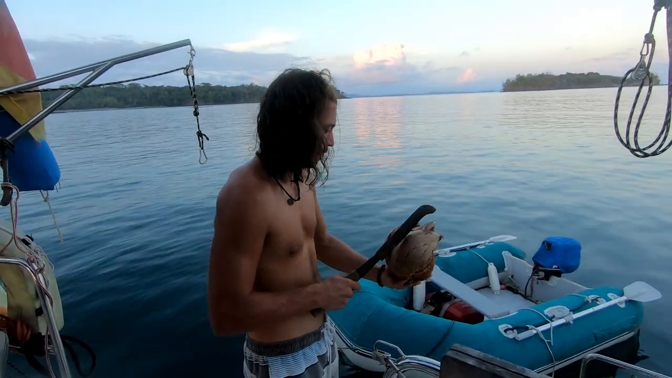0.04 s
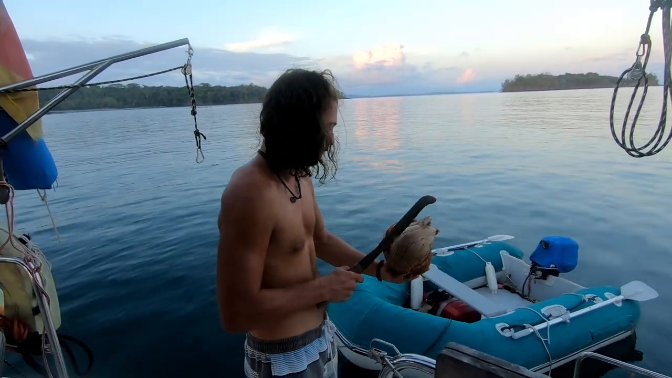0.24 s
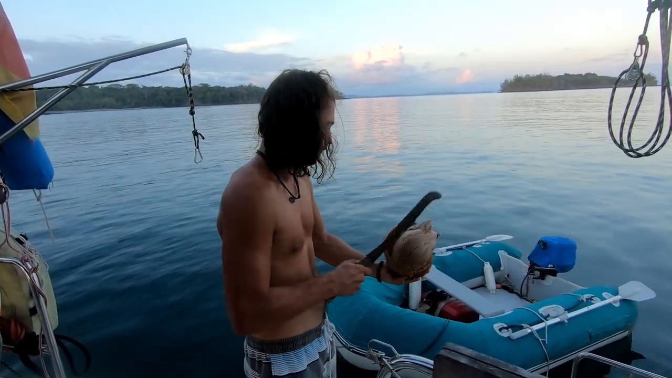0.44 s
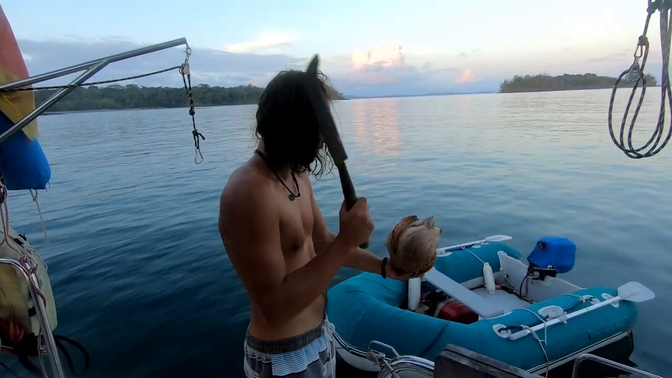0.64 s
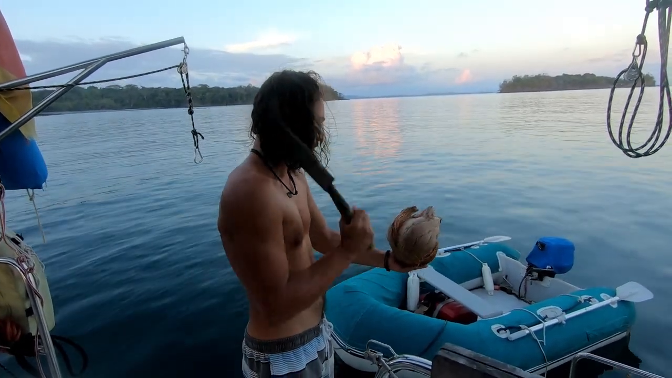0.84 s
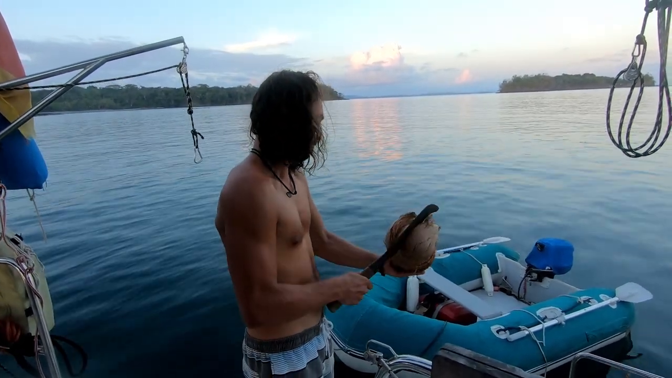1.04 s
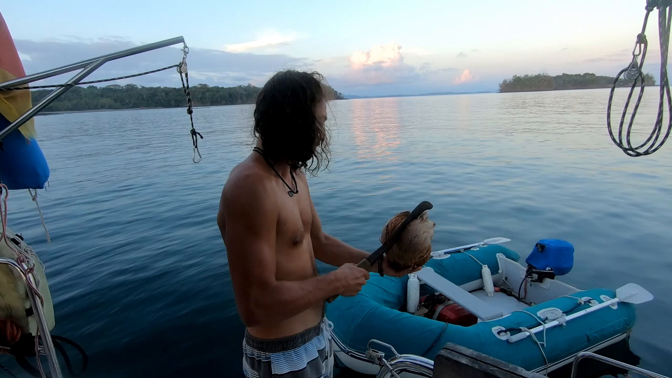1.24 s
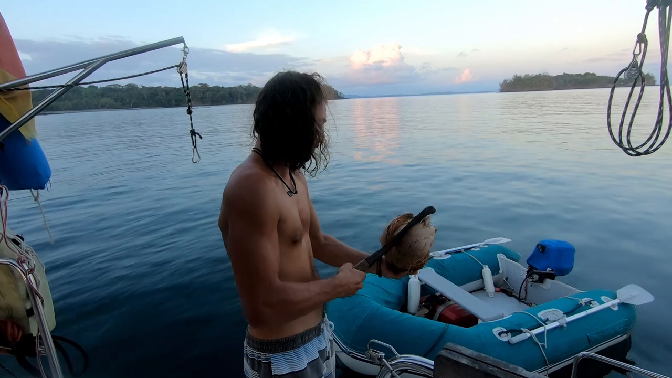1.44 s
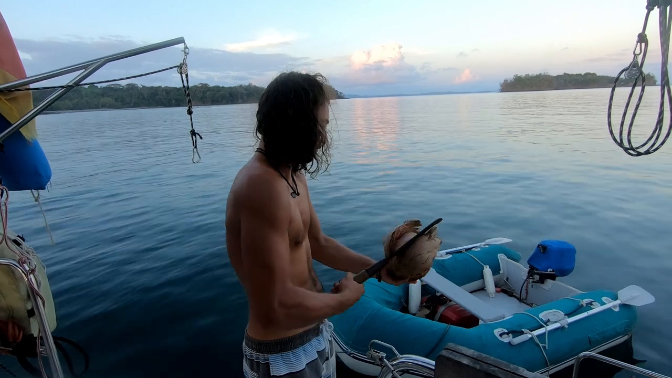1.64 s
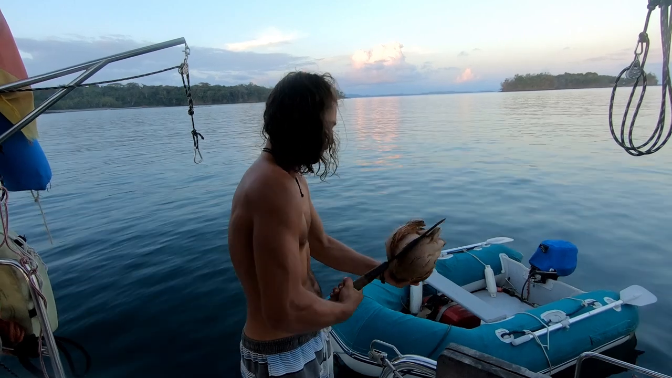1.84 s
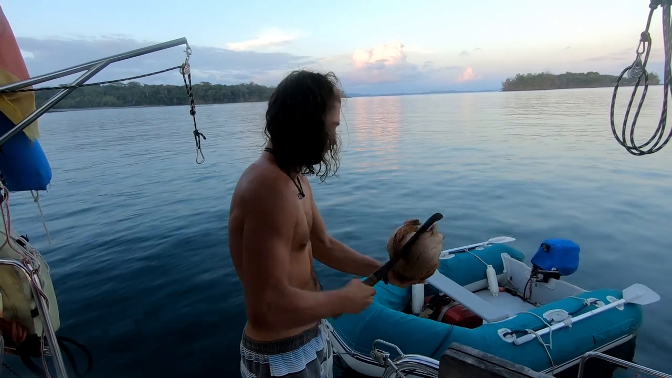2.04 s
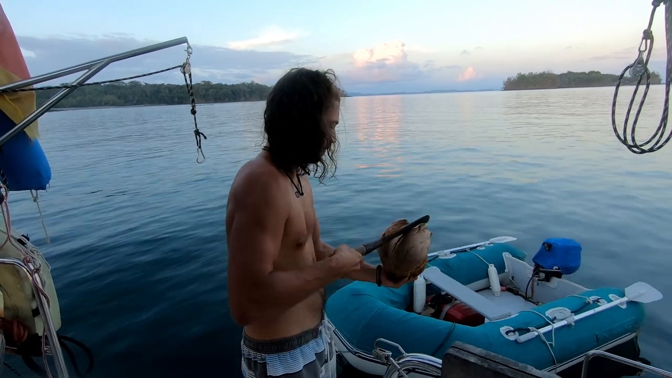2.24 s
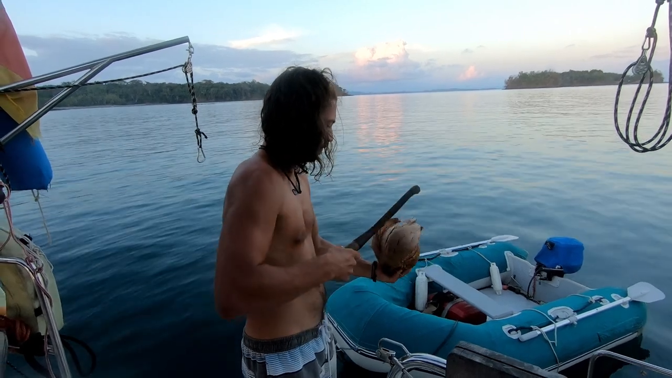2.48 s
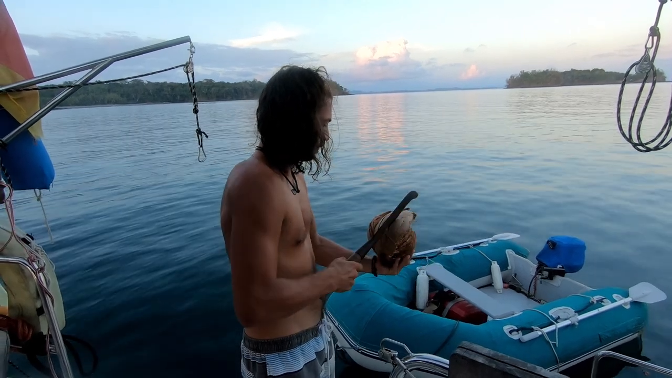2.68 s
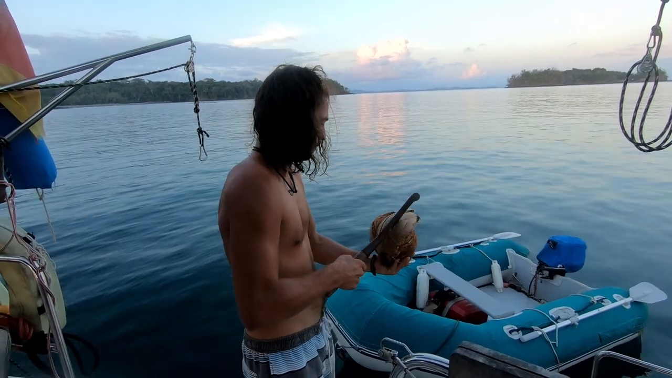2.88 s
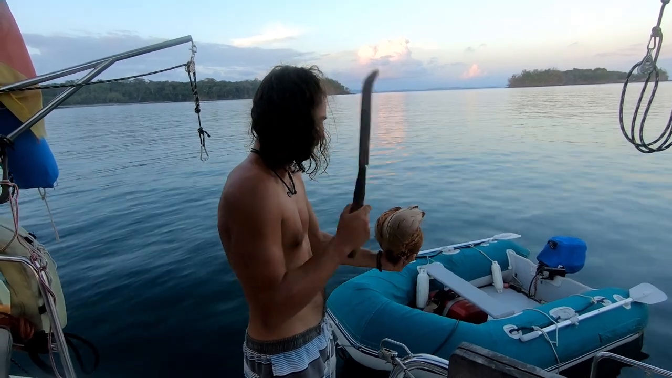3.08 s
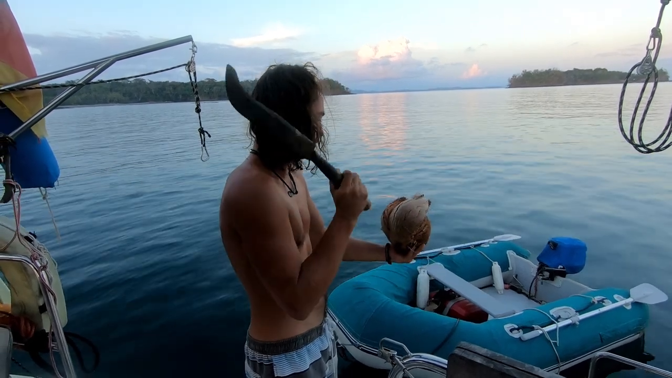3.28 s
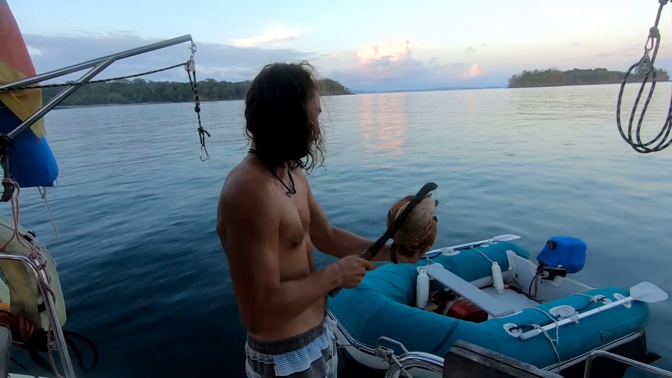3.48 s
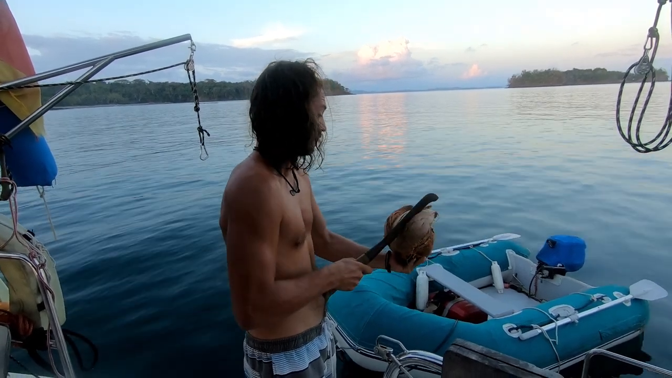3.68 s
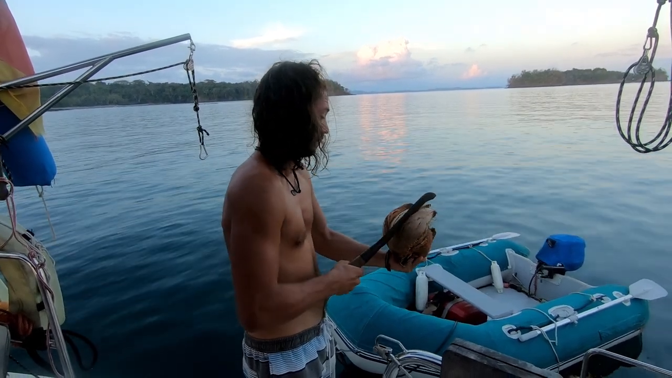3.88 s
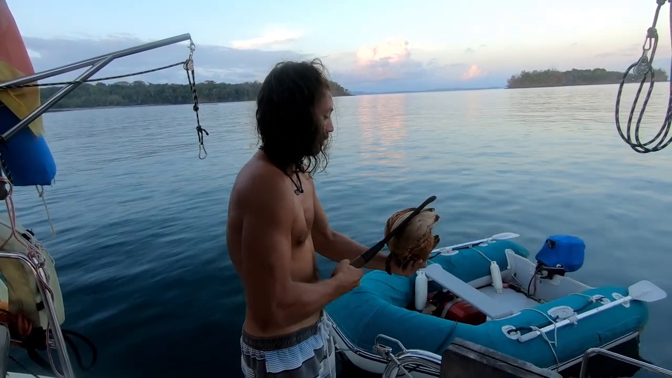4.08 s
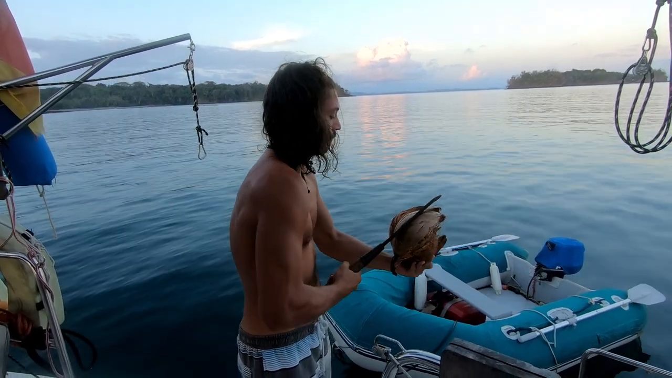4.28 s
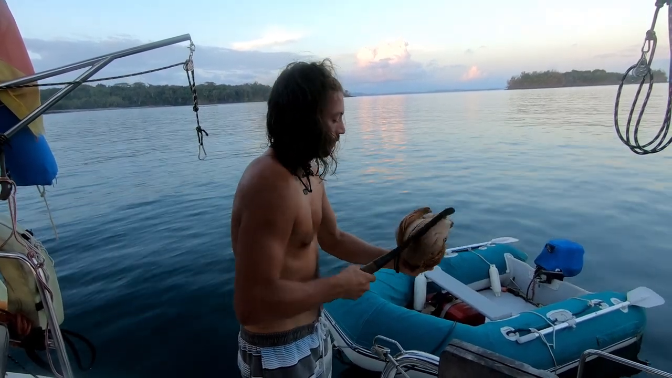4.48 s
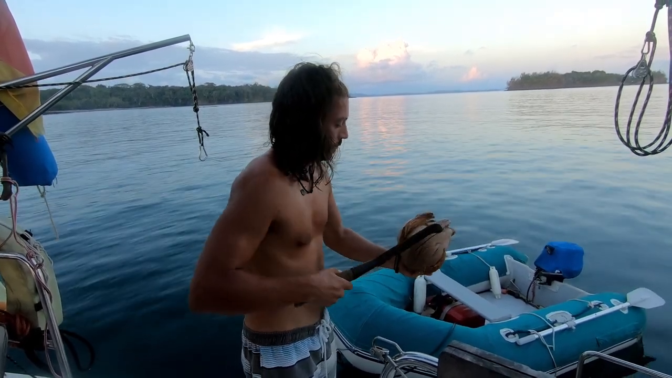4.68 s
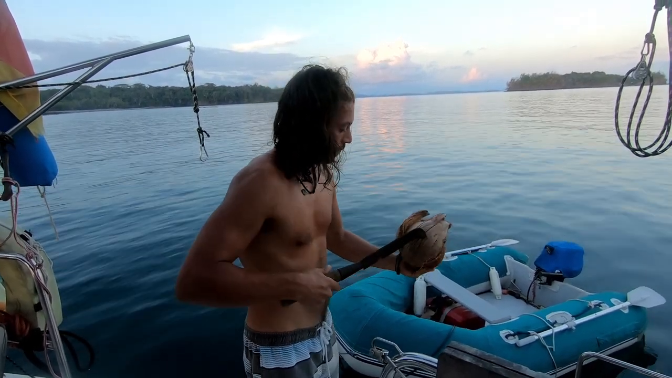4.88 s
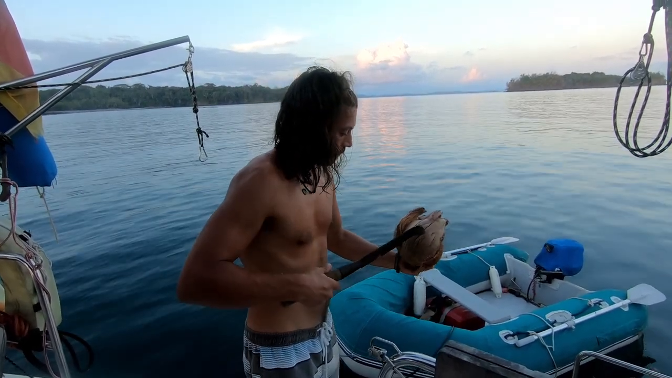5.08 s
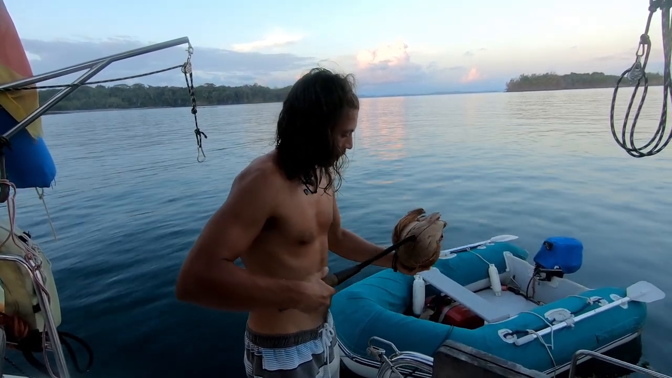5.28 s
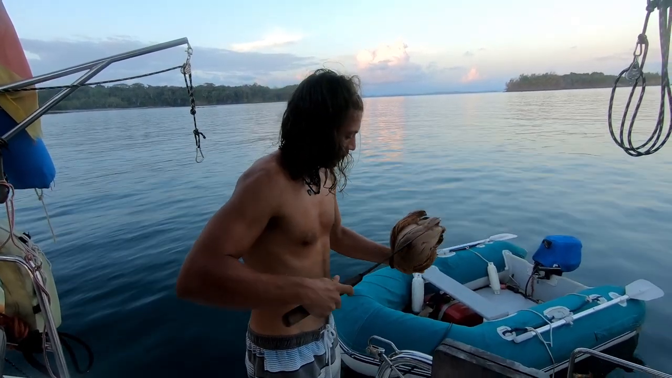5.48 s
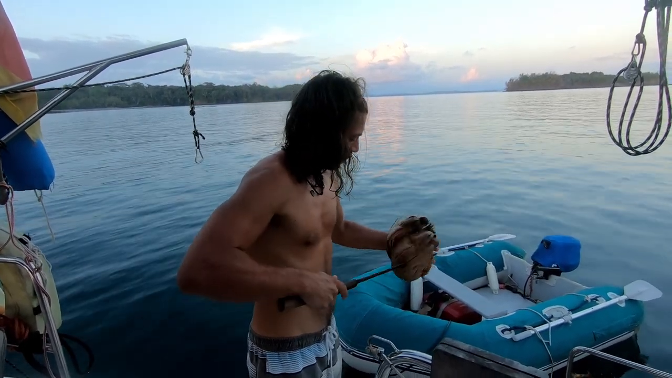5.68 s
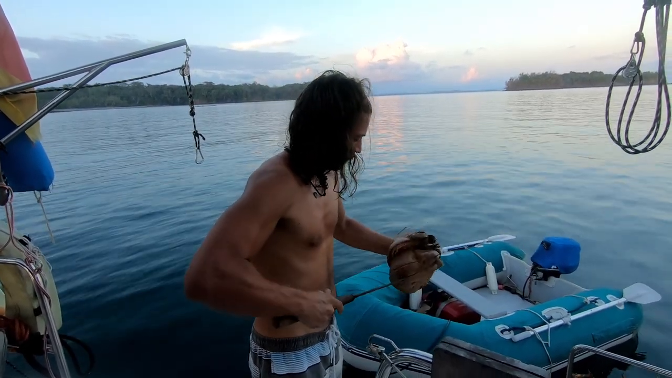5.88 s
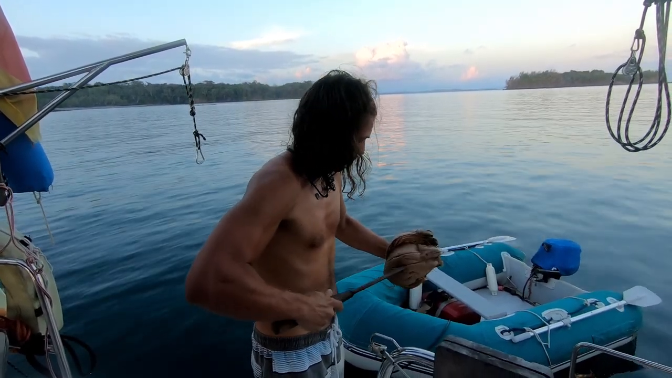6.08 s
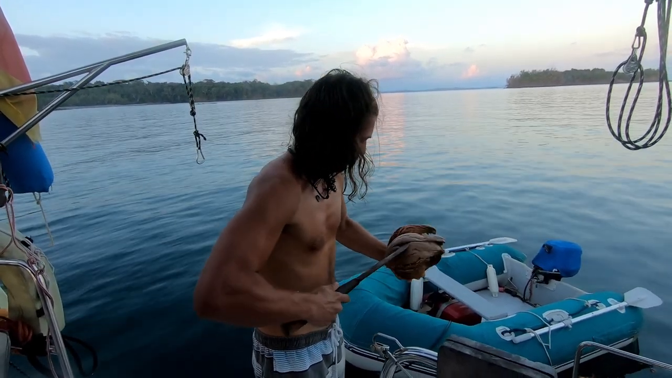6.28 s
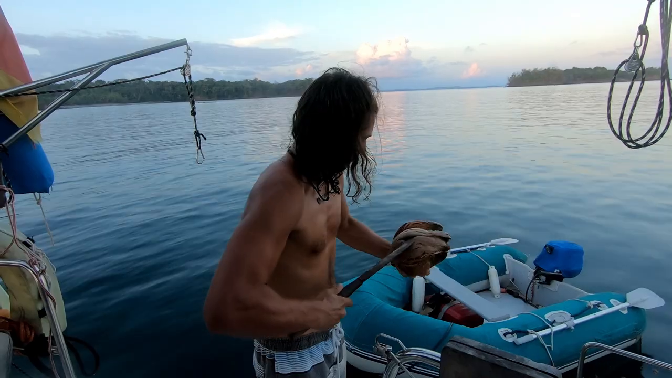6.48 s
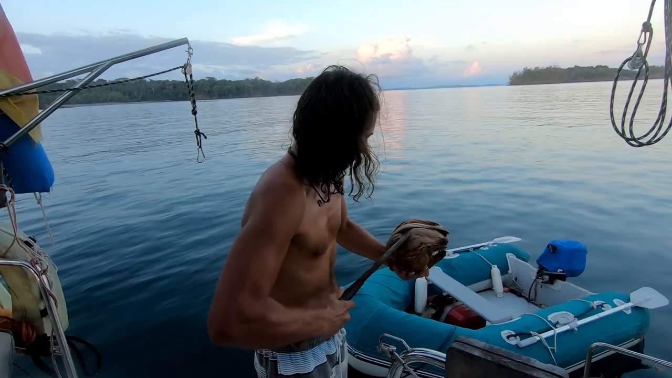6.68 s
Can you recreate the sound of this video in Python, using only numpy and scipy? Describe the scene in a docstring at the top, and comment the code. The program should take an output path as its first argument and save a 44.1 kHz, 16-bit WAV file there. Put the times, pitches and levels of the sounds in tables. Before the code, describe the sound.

Quiet water washes around a boat throughout, while light wind rumbles and puffs on the microphone, with one stronger thump near 2.9 seconds. A heavy blade knocks on a coconut right at the start, followed by a few faint taps. At 1 second comes a loud, sharp chop with a brief ring of shell, a hollow thud and crushed fibres. The husk rustles softly, and the blade rasps free around 2.3 seconds. A lighter chop lands at 2.7 seconds and another loud one at 3.5. From about 4 seconds the blade pries the husk with small ticks, scrapes out at 4.5, knocks softly near 4.9 and gives a few faint rasps. Very faint, thin whistles and chirps pass far off between 3.8 and 5.9 seconds. From 6 seconds to the end, near 6.7, fibres tear in a flurry of crisp snaps.

```python
"""On a boat at anchor, light wind buffets two microphone ports over a quiet wash of water throughout.
A heavy blade chops a hand-held coconut: a crack, a ringing shell, a hollow thud and crushed fibres.
A faint hiss comes and goes. Between blows the blade levers the husk, so fibres rustle and snap,
and it rasps as it is pulled free. In the second half thin whistles pass far off,
and a last levering ends the scene in a flurry of snaps."""
import sys
import numpy as np
from scipy import signal
from scipy.io import wavfile
from scipy.ndimage import uniform_filter1d

SR = 44100
rng = np.random.default_rng(int(sys.argv[2]) if len(sys.argv) > 2 else 0)


def master_out(mix):
    """Clip the mix to full scale and print it as 16-bit PCM to the path in sys.argv[1]."""
    frames = np.transpose(np.atleast_2d(mix))
    ceiling = np.clip(frames, -1, 1)
    pcm = np.round(ceiling * 32767).astype(np.int16)
    wavfile.write(sys.argv[1], SR, pcm)


N = 296220

# Levels are relative. A fade time (t60) is how long a sound takes to drop by 60 dB.
# How wind and water rise and fall: (time [s], rumble [dB], rush [dB], wash [dB])
WEATHER = [(0.0, -47, -59.5, -55.5), (0.822, -55.5, -62, -58.5), (2.129, -56.5, -65.5, -59),
           (2.73, -47, -62.5, -59.5), (3.03, -55.5, -65, -59.5), (6.72, -51.5, -72, -54.5)]
# Tone of the water and distant air: (frequency [Hz], level [dB])
WASH_TONE = [(120, -42.5), (200, -5), (283, -4.5), (360, -7), (850, -7), (950, -12), (1270, -8.5),
             (1620, -12.5), (2420, -17.5), (2960, -23), (5000, -30.5), (6500, -32.5), (9400, -37.5),
             (12000, -47.5), (16000, -82)]
# How alike the wash is on both sides: (frequency [Hz], likeness [0 to 1])
WASH_LIKENESS = [(60, 0.006), (180, 0.94), (550, 0.52), (1650, 0.19), (4970, 0.05), (15000, 0.15)]
# Which side the wash leans to: (frequency [Hz], left minus right [dB])
WASH_LEAN = [(60, -23), (180, 0.5), (550, 1), (1650, 2.5), (4970, -1), (15000, 6.5)]
# Tone of the deep wind rumble: (frequency [Hz], level [dB])
RUMBLE_TONE = [(8.8, -23.5), (15, -1.5), (39, -10.5), (54, -9.5), (87, -26.5), (130, -23), (170, -61),
               (290, -120)]
# Tone of the low rush of wind: (frequency [Hz], level [dB])
RUSH_TONE = [(70, -24.5), (130, 1), (170, 9.5), (260, -7), (400, -44.5)]
# Puffs on the ports: (time [s], level [dB], final pitch [Hz], left minus right [dB], fade time [s])
BUFFETS = [(0.066, -29, 131, 0, 0.022), (0.698, -52, 34.2, -19, 0.42), (2.499, -33.5, 50.5, -29, 0.13),
           (2.883, -11, 70, -29, 0.02), (3.59, -41, 42, -18, 0.11), (4.429, -42, 36, -30, 0.14),
           (4.459, -31.5, 38, 0, 0.016), (5.386, -33.5, 65, 11.5, 0.067), (5.448, -38.5, 33.6, -21, 0.12),
           (5.918, -43, 34.6, -12, 0.056), (6.398, -27.5, 48.4, -5.5, 0.016),
           (6.524, -50.5, 161, -1, 0.085)]
# Blade blows; thud, shell and crush are added to the level:
# (time [s], level [dB], thud [dB], shell [dB], favoured pitch [Hz], crush [dB], brightness [dB/octave])
CHOPS = [(0.0324, -19, -19.5, -10, 3380, -22.5, -2.5), (0.338, -37, -5.5, 3, 3060, 1.5, -0.5),
         (0.375, -48, -10.5, -10, 2600, -6, -9), (0.557, -58, 13, -16.5, 1000, -16, -7),
         (0.9988, -3, -16.5, -15, 1740, -19.5, -2.5), (2.221, -49, 5.5, -33, 900, 10, -12),
         (2.7153, -17, -37, -19.5, 1380, -18.5, 0), (2.759, -33.5, -14, -18, 1990, -14.5, -3.5),
         (3.5187, -4, -18.5, -23, 1900, -23, -0.2), (3.603, -51, -25, -1, 2080, -15, 0),
         (4.927, -42.5, -6, -7, 1670, -2.5, -1.5)]
# Tone of the blade's first contact: (frequency [Hz], level [dB])
CRACK_TONE = [(500, -15.5), (1870, -11), (3290, -1), (5470, -5), (7530, -12), (8700, -5.5), (13300, -27),
              (16000, -61.5)]
# Tone of crushed fibres settling: (frequency [Hz], level [dB])
CRUSH_TONE = [(290, -22), (600, -12), (960, -4.5), (1400, 1.5), (1950, -7), (2600, -3.5), (5000, -10.5),
              (9630, -11.5), (13300, -25.5), (16000, -45)]
# Notes the hard shell rings with: (pitch [Hz], level [dB], fade time [s])
SHELL_NOTES = [(773, 5, 0.046), (949, 6, 0.052), (1020, -4, .05), (1155, -2, 0.053), (1340, -5.5, 0.04),
               (1440, -1, 0.059), (1530, 0, 0.085), (1875, -4, 0.07), (2012, -1.5, 0.082),
               (2140, -1, 0.068), (2366, -9, 0.075), (2710, -11.5, 0.053), (2850, -1, 0.03),
               (3220, 0, 0.038), (3510, -9.5, 0.031), (4220, -12.5, 0.018), (5400, -12.5, .02)]
# Low notes of the nut's hollow: (pitch [Hz], level [dB], fade time [s])
HOLLOW_NOTES = [(146, -2.5, 0.093), (275, 1.5, .06), (428, -8, 0.045)]
# Swells of faint hiss: (start [s], hold [s], level [dB])
HISS_SWELLS = [(0.04, 0.052, -67), (1.3, 0.42, -79), (2.95, 0.33, -77.5)]
# Tone of the hiss, with narrow peaks: (frequency [Hz], level [dB])
HISS_TONE = [(4300, -16), (4930, 1), (5600, -12.5), (7170, -4.5), (7800, -10.5), (9160, -1), (11000, -11),
             (14500, -30.5)]
# The blade levering the fibres: (start [s], hold [s], level [dB])
LEVERINGS = [(0.768, 0.02, -62), (1.543, 0.22, -68.5), (1.73, 0.22, -64), (2.073, 0.11, -67.5),
             (2.854, 0.0088, -71.5), (3.958, 0.15, -61.5), (4.078, 0.16, -63.5), (4.223, 0.07, -54),
             (4.84, 0.0083, -67.5), (4.968, 0.011, -60), (5.675, 0.13, -63.5), (5.981, 0.04, -54),
             (6.07, 0.06, -64), (6.257, 0.099, -52.5), (6.53, 0.022, -50), (6.593, 0.064, -57)]
# Bright tone of fibres slipping or breaking: (frequency [Hz], level [dB])
FIBRE_TONE = [(1400, -15), (2400, -7.5), (3250, -3), (3800, -5.5), (4350, -6.5), (5500, -5.5), (6400, -11),
              (8800, -5.5), (12000, -19.5), (16000, -40)]
# Single fibres snapping: (time [s], level [dB], pitch [Hz])
SNAPS = [(1.634, -39.5, 6000), (1.79, -40.5, 8450), (1.831, -42, 8000), (1.851, -36.5, 3200),
         (1.879, -38, 5700), (1.8948, -40, 9500), (2.3149, -27, 5170), (2.462, -47.5, 2860),
         (3.7148, -46.5, 7800), (3.9977, -39.5, 9400), (4.0274, -38.5, 4450), (4.0929, -35.5, 9000),
         (4.242, -42, 8750), (4.26, -37.5, 8600), (4.2767, -30.5, 8000), (4.2986, -44, 4600),
         (4.303, -41, 9300), (4.971, -46.5, 3930), (5.603, -35.5, 3980), (5.9769, -32.5, 4140),
         (5.996, -32, 3900), (6.018, -48, 2980), (6.069, -34, 4370), (6.08, -36.5, 6000),
         (6.111, -37, 3900), (6.1363, -43, 4570), (6.2066, -45, 7000), (6.238, -31, 4600),
         (6.2447, -23, 5000), (6.2745, -27.5, 4700), (6.303, -34, 5500), (6.3207, -28, 6040),
         (6.338, -31.5, 4340), (6.3601, -30.5, 7150), (6.454, -48, 9000), (6.4916, -28, 5370),
         (6.5167, -36.5, 8300), (6.559, -31.5, 8700), (6.583, -39, 10100), (6.6017, -25, 8000),
         (6.614, -25.5, 8600), (6.62, -33, 8540), (6.659, -48, 4800), (6.6932, -38.5, 6050)]
# Notes the wedged blade rings with: (pitch [Hz], level [dB], fade time [s])
BLADE_NOTES = [(3100, -1, 0.014), (3720, -5, 0.014), (4320, -1.5, 0.022), (5120, -5, 0.012),
               (5550, -2, 0.017), (6870, -1, 0.012), (8820, 2, 0.007)]
# The blade dragged through the cut: (start [s], contact [s], rasp [dB], treble [dB], jerk over rasp [dB])
PULLS = [(2.23, 0.095, -42.5, -43.5, 8.5), (4.498, 0.118, -44, -48, 11.5),
         (5.275, 0.035, -52.5, -56.5, 2.5), (5.391, 0.032, -50.5, -56, -11), (5.604, 0.038, -55, -58, 3),
         (5.101, 0.083, -62, -85, 4.5)]
# Tone of the blade rasping on the shell: (frequency [Hz], level [dB])
RASP_TONE = [(410, -24), (900, -10), (1100, -3), (1450, 6), (1750, -1.5), (2000, 6), (2500, 2),
             (2950, -2.5), (3900, -7), (5200, -81)]
# Path of the long whistle: (time [s], pitch [Hz], level [dB])
WHISTLE_PATH = [(3.78, 5950, -79), (3.95, 6700, -78), (3.99, 7350, -74), (4.085, 7600, -74),
                (4.125, 8600, -69), (4.2, 8200, -71), (4.26, 7900, -82), (4.31, 7450, -70),
                (4.36, 7250, -72), (4.41, 6400, -75), (4.52, 4950, -74)]
# Short chirps: (start [s], length [s], first pitch [Hz], arch height [Hz], last pitch [Hz], level [dB])
CHIRPS = [(4.615, .03, 6020, 60, 6000, -59), (4.715, .095, 4800, 260, 4830, -68),
          (4.98, .1, 2740, 0, 2750, -67), (5.85, .055, 3350, 0, 3050, -64)]
# Which side the direct sound leans to: (frequency [Hz], left minus right [dB])
DIRECT_LEAN = [(60, -4.5), (180, 1), (550, -2.5), (1650, -5.5), (4970, -0.5), (15000, 4.5)]


def gain_of(db):
    """Turn decibels into a factor to multiply by."""
    return 10 ** (np.asarray(db) / 20)


def evened(x):
    """Scale a signal to an average power of one."""
    return x / np.sqrt(np.mean(x ** 2) + 1e-20)


def wobble(length, size):
    """A random wavering curve: noise averaged over size samples."""
    return evened(uniform_filter1d(rng.standard_normal(length), size))


def read(points, hz):
    """Read a table's value between its listed frequencies."""
    f, value = np.transpose(points)
    return np.interp(np.log(hz + 1), np.log(f + 1), value)


def add(mix, s, sound):
    """Mix a sound in, starting at s seconds."""
    part = mix[..., round(s * SR):][..., :sound.shape[-1]]
    part += sound[..., :part.shape[-1]]


def colour(x, tone, tilt_db=0., size=4096):
    """Filter x to a tone table, brightened by tilt_db per octave; nothing rings ahead of the sound."""
    hz = abs(np.fft.fftfreq(size, 1 / SR))
    db = read(tone, hz) + tilt_db * np.log2((hz + 100) / 3000)
    log_gain = np.log(gain_of(np.maximum(db, -100)))
    taps = np.fft.ifft(np.exp(np.conj(signal.hilbert(log_gain)))).real[:size // 2]
    return signal.oaconvolve(x, taps / np.linalg.norm(taps))[:len(x)]


def ring(notes, t, detune=.006):
    """A struck object's dying sine waves, a little different in level and pitch each time."""
    level_db, pitch, phase = rng.normal([0, 1, 0], [1.5, detune, 1], (len(notes), 3)).T
    hz, db, t60 = np.transpose(notes)[:, :, None]
    waves = np.sin(2 * np.pi * hz * pitch[:, None] * t + phase[:, None])
    return (gain_of(db + level_db[:, None] - 60 * t / t60) * waves).sum(axis=0)


def distance(hz, *pitches):
    """Octaves from hz to the nearest of the pitches, squared."""
    return min(np.log2(hz / np.array(pitches)) ** 2)


def swells(start, hold, db, rise_db_per_s, fall_db_per_s):
    """A loudness curve that rises, holds and fades for each event."""
    t = np.arange(0, N / SR + .002, .001)[:, None]
    away_db = rise_db_per_s * np.maximum(start - t, 0) + fall_db_per_s * np.maximum(t - start - hold, 0)
    return np.interp(np.arange(N) / SR, t[:, 0], gain_of(db - away_db).max(axis=1))


def wash():
    """Water and distant air: soft noise with drifting louder and quieter patches."""
    frames, hz = N // 256 + 5, np.fft.rfftfreq(1024, 1 / SR)
    a, b, c, d, patches = rng.standard_normal((frames, 513, 5)).T
    patches = evened(uniform_filter1d(uniform_filter1d(patches, size=10, axis=0), size=20, axis=1))
    likeness, lean = read(WASH_LIKENESS, hz)[:, None], read(WASH_LEAN, hz)[:, None] / 2
    left = a + 1j * b
    right = likeness * left + np.sqrt(1 - likeness ** 2) * (c + 1j * d)
    tone = gain_of(read(WASH_TONE, hz)[:, None] + 1.8 * patches)
    spectra = np.array([left, right]) * tone * gain_of([lean, -lean])
    water = evened(signal.istft(spectra, nperseg=1024, noverlap=768)[1][:, :N])
    s, _, _, db = np.transpose(WEATHER)
    return gain_of(np.interp(np.arange(N) / SR, s, db)) * water


def wind():
    """Each port rumbles on its own, both share a low rush, and puffs thump with falling pitch."""
    t = np.arange(N) / SR
    s, rumble_db, rush_db, _ = np.transpose(WEATHER)
    rumble = np.array([evened(colour(rng.standard_normal(N), RUMBLE_TONE, size=32768)) for _ in range(2)])
    rush = evened(colour(rng.standard_normal(N), RUSH_TONE, size=16384))
    out = gain_of(np.interp(t, s, rush_db)) * np.array([rush, rush])
    rumble_gain = gain_of(np.interp(t, s, rumble_db) + [[0], [6]])  # stronger on the right
    t = t[:SR // 4]
    for s, db, hz, lean_db, t60 in BUFFETS:
        cycles = hz * (t + .0065 * (1 - np.exp(-t / .0023)))
        thump = -np.sin(2 * np.pi * cycles) * gain_of(-60 * t / t60) * (1 - np.exp(-t / .0054)) ** 2
        ports = gain_of([[min(lean_db, 0)], [min(-lean_db, 0)]])
        add(out, s, gain_of(db + 21) * ports * thump)
        eddies = gain_of(db + 6.5 - 60 * t / .088) * (1 - np.exp(-t / .02))  # swirls trail each puff
        add(rumble_gain, s, ports * eddies)
    return out + rumble_gain * rumble


def chops():
    """Each blow cracks sharply, sets the nut ringing and crushes fibres."""
    out, t = np.zeros(N), np.arange(SR // 4) / SR
    for s, db, thud_db, shell_db, favoured_hz, crush_db, tilt_db in CHOPS:
        bite = gain_of(2.5 - 60 * t / .01) * rng.standard_normal(len(t))
        bite[0] = 5  # the click of first contact
        crack = colour(bite, CRACK_TONE, tilt_db)
        settle_s = max(.125 + .0015 * db, .03)  # fibres settle longer after a harder blow
        settling = gain_of(crush_db - 60 * t / settle_s) * rng.standard_normal(len(t))
        crush = colour(settling, CRUSH_TONE, tilt_db)
        # where the blow lands favours the notes near one pitch and its overtone
        notes = [(hz, note_db - 57 * distance(hz, favoured_hz, 2.17 * favoured_hz), t60)
                 for hz, note_db, t60 in SHELL_NOTES]
        jolts = gain_of(6.3 * np.tanh(wobble(len(t), 60)))  # the jolting blade makes the ring uneven
        shell = gain_of(shell_db) * ring(notes, t) * jolts * (1 - np.exp(-t / .00009))
        sink_in = (1 - np.exp(-t / .001)) ** 2  # the bass swells as the blade sinks in
        thud = gain_of(thud_db) * ring(HOLLOW_NOTES, t, detune=.009) * sink_in
        # a faint one-millisecond rise of noise leads into the crack
        lead_in = gain_of(-29) * np.linspace(0, 1, SR // 1000) ** 2 * rng.standard_normal(SR // 1000)
        add(out, s, gain_of(db) * np.concatenate([lead_in, .35 * crack + crush + shell + thud]))
    return out


def hiss():
    """Faint noise in narrow high bands slowly swells and fades."""
    level = swells(*np.transpose(HISS_SWELLS), rise_db_per_s=70, fall_db_per_s=90)
    return level * evened(colour(rng.standard_normal(N), HISS_TONE))


def slips(per_s, spread_db):
    """Tiny slips make random clicks, most small and a few large."""
    size = gain_of(spread_db * np.minimum(rng.exponential(1, N), 4)) * rng.choice([-1, 1], N)
    return evened(size * (rng.random(N) < per_s / SR))


def rustle():
    """Levered fibres slip in clumps, and the husk strains faintly before and after each push."""
    clumps = gain_of(3 * wobble(N, SR // 150))
    start, hold, db = np.transpose(LEVERINGS)
    push = swells(start, hold, db, rise_db_per_s=355, fall_db_per_s=314)
    strain = swells(start, hold, db - 14.5, rise_db_per_s=48, fall_db_per_s=48)
    fibres = evened(colour(slips(per_s=2500, spread_db=4.2) * clumps, FIBRE_TONE))
    return fibres * np.maximum(push, strain)


def snaps():
    """A breaking fibre ticks, fizzes and rings the blade; hard, high snaps tick more sharply."""
    out, t = np.zeros(N), np.arange(SR // 12) / SR
    rise = 1 - np.exp(-t / .00016)
    for s, db, hz in SNAPS:
        tick_db = 16 + .4 * (db + 28) + 8 * np.log2(hz / 6500)
        tick = gain_of(tick_db - 60 * t / .00075) * np.sin(2 * np.pi * hz * t)
        burst = gain_of(-11 - 60 * t / .016) * rng.standard_normal(len(t))
        fizz = colour(burst, FIBRE_TONE, tilt_db=6 * np.log2(hz / 5000))
        # the blade rings most near the snap's pitch and near a lower one
        notes = [(note_hz, note_db + rng.normal(0, 3) - 18 * distance(note_hz, hz, hz / 2.8), t60)
                 for note_hz, note_db, t60 in BLADE_NOTES]
        blade = gain_of(-10.5) * ring(notes, t, detune=.01)
        add(out, s, gain_of(db) * rise * (tick + fizz + blade))
    return out


def rasp():
    """The pulled blade scrapes through the shell, then tears free with a short jerk."""
    free_s, release_db_per_s = .026, 746  # the rasp peaks free_s before contact ends, then stops fast
    scrape = slips(per_s=3000, spread_db=2.6)
    start, contact, rasp_db, treble_db, jerk_db = np.transpose(PULLS)
    peak = start + contact - free_s
    touch = swells(start, contact, 0, release_db_per_s / 2, release_db_per_s)
    drag = swells(peak, 0, rasp_db, rise_db_per_s=134, fall_db_per_s=229)
    jerk = swells(peak, 0, rasp_db + jerk_db, rise_db_per_s=791, fall_db_per_s=791)
    treble = swells(peak, free_s, treble_db, rise_db_per_s=189, fall_db_per_s=release_db_per_s)
    coarse = np.maximum(drag, jerk) * colour(scrape, RASP_TONE)
    return touch * (coarse + treble * colour(scrape, FIBRE_TONE))


def thin_tone(hz, db):
    """An almost pure tone that flutters in pitch and breaks up in level."""
    flutter, breaks = wobble(len(hz), 300), wobble(len(hz), 300)
    cycles = np.cumsum(hz * (1 + .005 * flutter)) / SR
    soft_ends = signal.windows.tukey(len(hz), min(.03 * SR / len(hz), 1))
    return gain_of(db + 2.5 * breaks) * soft_ends * np.sin(2 * np.pi * cycles)


def whistles():
    """Far off, one long whistle wanders, then short chirps arch or slide in pitch."""
    out = np.zeros(N)
    s, hz, db = np.transpose(WHISTLE_PATH)
    t = np.arange(s[0], s[-1], 1 / SR)
    add(out, s[0], thin_tone(np.interp(t, s, hz), np.interp(t, s, db)))
    for s, length, first_hz, arch_hz, last_hz, db in CHIRPS:
        progress = np.arange(0, 1, 1 / (length * SR))
        arch = np.sin(np.pi * progress)
        hz = first_hz + (last_hz - first_hz) * progress + arch_hz * arch
        add(out, s, thin_tone(hz, db - 8 * (1 - arch)))
    return out


def echoes(x):
    """Sound scatters off deck, body and water, differently for each port; the treble dies first."""
    t = np.arange(SR // 8) / SR
    taps = rng.choice([-1., 1.], (2, len(t))) * (rng.random((2, len(t))) < .06) * (t > .0008)
    dull = uniform_filter1d(taps, size=9, axis=1)
    taps = dull * gain_of(-60 * t / .2) + (taps - dull) * gain_of(10.5 - 60 * t / .056)
    taps /= np.linalg.norm(taps[0])
    taps[:, round(.0048 * SR)] += gain_of(-11.5)  # one early echo reaches both ports
    return signal.oaconvolve(x[None], taps, axes=1)[:, :N]


def scene():
    """Spread the cutting, whistles and hiss to left and right, then add echoes, wind and water."""
    sounds = chops() + snaps() + rustle() + rasp() + whistles() + hiss()
    hz = np.fft.rfftfreq(N, 1 / SR)
    lean = read(DIRECT_LEAN, hz) / 2
    shift = np.exp(.5j * (hz / 10000) ** 2)  # the housing puts the treble out of step between the ports
    direct = np.fft.irfft(np.fft.rfft(sounds) * gain_of([lean, -lean]) * [1 / shift, shift], N)
    return direct + gain_of(-6.5) * echoes(sounds) + wind() + wash()


def record(dry):
    """The recorder rounds off the hardest peaks and cuts the highest treble."""
    ceiling, top_hz = .93, 15900
    rounded = dry / (1 + (abs(dry) / ceiling) ** 6) ** (1 / 6)
    treble_cut = signal.firwin(511, top_hz, window=("kaiser", 9), fs=SR)
    return signal.oaconvolve(rounded, treble_cut[None], "same")


dry = scene()
out = record(dry)
master_out(out)
```